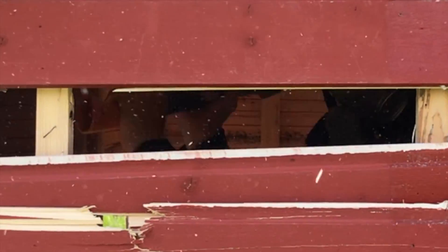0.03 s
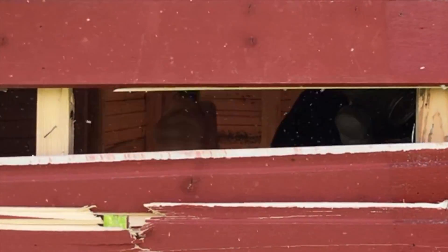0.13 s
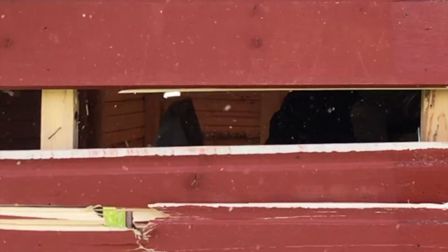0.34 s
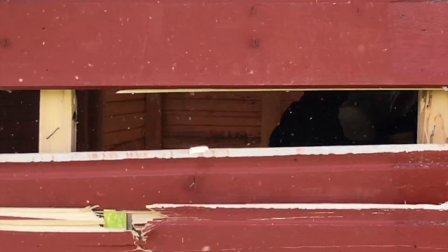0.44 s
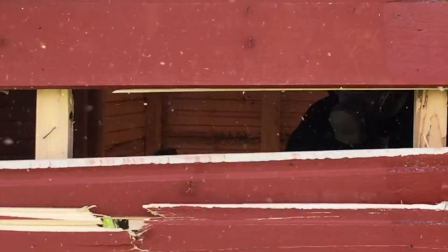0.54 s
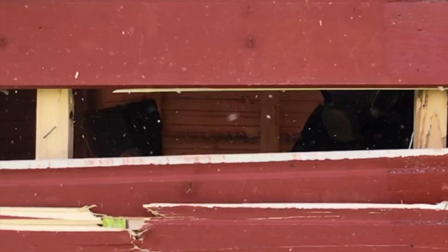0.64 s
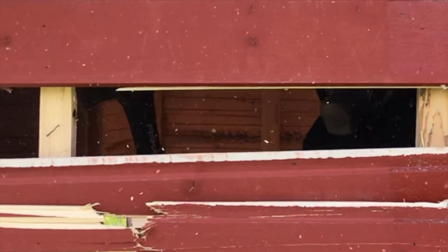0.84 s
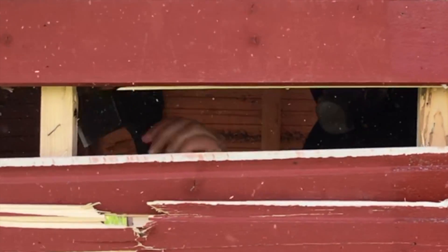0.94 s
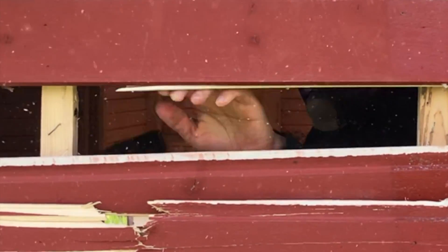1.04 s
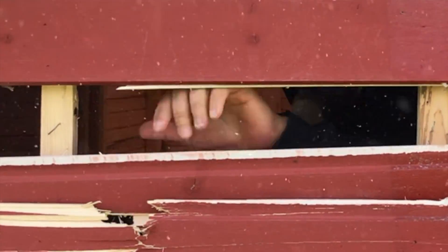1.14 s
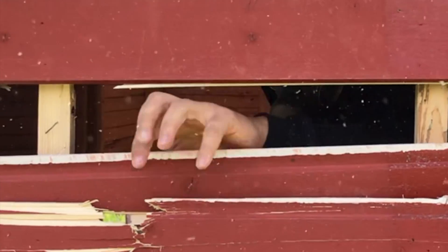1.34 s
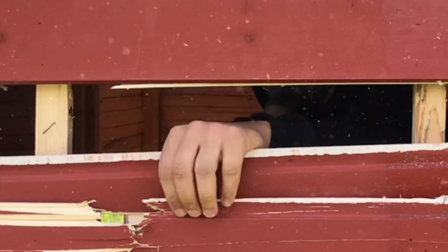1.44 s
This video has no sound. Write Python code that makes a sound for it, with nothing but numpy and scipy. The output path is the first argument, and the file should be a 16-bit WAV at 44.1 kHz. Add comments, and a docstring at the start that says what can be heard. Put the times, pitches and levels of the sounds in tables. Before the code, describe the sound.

Close to a shed wall outdoors, after a faint tap, a heavy blow from inside snaps and splits a plank with a deep boom; splinters tick down, a loose piece clacks later, and a tiny dull knock ends it.

```python
"""Close outside a shed, microphone near the wall: a heavy blow from inside breaks a painted board.
Fibres snap and tear as short noise bursts and board modes, and a split runs along the grain as tiny tones.
The wall booms and rumbles with pulses, damped modes and low noise; a loose piece clacks and pings.
Splinters tick and scrape, pieces knock and scuff inside, all as shaped noise, with a small dull knock late.
Faint tails of decaying noise answer from shed and yard, over faint outdoor air."""
import sys
import numpy as np
from scipy import signal
from scipy.fft import rfft, irfft
from scipy.io import wavfile

SR = 44100
rng = np.random.default_rng(int(sys.argv[2]) if len(sys.argv) > 2 else 0)


def int16_out(signal):
    """Quantize to a 16-bit WAV file."""
    q = np.round(np.clip(np.atleast_2d(signal).T, -1, 1) * 32767)
    wavfile.write(sys.argv[1], SR, q.astype(np.int16))


N = 66150
T = np.arange(N) / SR  # s
HZ = np.fft.rfftfreq(2 * N, 1 / SR)

# Spectra and mode levels below are relative; t60 is the time to fall by 60 dB.
# Fibre bundles giving way: [t/s, level/dB, brightness/dB per octave]
SNAPS = [(0.2189, -40, 3), (.228, -36, -2), (0.231, -20.5, 1.5), (0.2362, -17.5, 1.5), (0.2418, -16, 1),
         (0.244, -17, -1.5), (0.2498, -19.5, 1), (0.259, -25, -3), (.266, -22.5, 2), (.275, -20, 0.5),
         (.283, -25, -1), (0.2935, -30, 2.5), (.306, -29.5, -2), (0.3181, -28, -1), (0.3274, -28.5, -2.5),
         (0.338, -41, 1), (.352, -37.5, 0.5)]
# Tone of snapping wood: [f/Hz, level/dB]
WOOD_TONE = [(60, -7.5), (200, 7), (400, 0), (560, -0.5), (750, 0.5), (1400, -2.5), (2900, -2.5),
             (3600, -10), (6000, -6), (9000, -14.5), (12000, -20.5), (16000, -27)]
# Dying away of a snap: [f/Hz, t60/s]
SNAP_DECAY = [(200, 0.21), (1500, 0.083), (5000, 0.038), (14000, 0.023)]
# Ringing modes of the board: [f/Hz, level/dB, t60/s]
BOARD_MODES = [(484, -5, .25), (1030, 1, .18), (1110, 0, .18), (1551, -4, .13), (1774, -1, .15),
               (2093, -4, .15), (2306, 0, .13), (2642, -1, .12), (2947, 3, .12), (3088, -1, .12)]
# Fibres tearing as the board bends away: [t/s, level/dB]
TEAR_LEVEL = [(.225, -68.5), (.24, -26.5), (.285, -26), (.31, -31.5), (.335, -46.5), (.37, -54),
              (.405, -76)]
# Tone of single fibres: [f/Hz, level/dB]
FIBRE_TONE = [(500, -2), (1500, -2.5), (3000, 1), (6000, -2.5), (10000, -10), (16000, -13.5)]
# Pushes on the wall: [t/s, level/dB, contact pitch f/Hz]
THUMPS = [(0.194, -46.5, 79), (0.2334, -25.5, 212), (0.2382, -13.5, 202), (0.2491, -14.5, 196),
          (0.2656, -20, 190), (0.2753, -15.5, 73), (0.2939, -20, 200), (.306, -11, 119), (.479, -32, 173),
          (0.546, -35.5, 172), (.606, -38, 130), (0.906, -35, 126), (1.116, -28.5, 78), (1.232, -39.5, 172),
          (1.36, -45, 233), (1.381, -39.5, 73)]
# Ringing modes of the wall: [f/Hz, level/dB, t60/s]
WALL_MODES = [(62, 0, .5), (95, 1, .5), (120, -3, .45), (160, -3, .55), (191, -1, .4), (251, -6, .55),
              (298, -5, .45), (331, -4, .5), (398, -6, .4)]
# Low rumble of the shaken wall: [t/s, level/dB]
RUMBLE_LEVEL = [(0, -62), (.17, -53.5), (.24, -40), (.33, -29.5), (.42, -50), (.57, -40.5), (.7, -56),
                (.82, -55.5), (.91, -49), (1.0, -50.5), (1.12, -45), (1.27, -47), (1.32, -56.5), (1.5, -57)]
# Tone of the rumble: [f/Hz, level/dB]
RUMBLE_TONE = [(15, -16.5), (35, -3.5), (62, 4), (100, -2.5), (180, -11.5), (300, -19.5), (600, -47),
               (2000, -82)]
# Strikes of the loose piece: [t/s, level/dB]
CLACKS = [(1.069, -40), (1.0737, -29.5), (1.0798, -23), (1.0863, -27), (1.166, -45.5)]
# Tone of a clack: [f/Hz, level/dB]
CLACK_TONE = [(150, 4.5), (600, -10), (870, -8), (1400, -1.5), (2200, -7), (3200, 5.5), (4300, -2),
              (5400, 1), (7800, -4.5), (9500, -8.5), (12000, -6), (16000, -14)]
# Dying away of a clack: [f/Hz, t60/s]
CLACK_DECAY = [(800, 0.13), (3000, 0.05), (12000, 0.037)]
# Ringing modes of the loose piece: [f/Hz, level/dB, t60/s]
PIECE_MODES = [(870, 0, .08), (1400, -8, .08), (1868, -9, 0.08), (3082, -2, 0.06), (3330, -2, 0.06),
               (4478, -5, .06), (5255, 0, 0.08), (5420, -11, .2), (5532, 2, .07)]
# Hard contacts squeaking for an instant: [t/s, level/dB, f/Hz]
PINGS = [(1.0744, -27.5, 7700), (1.0792, -15, 5450), (1.0875, -21, 5450)]
# Pieces landing and scraping inside: [t/s, level/dB, brightness/dB per octave]
KNOCKS = [(.083, -50.5, 1), (0.4129, -34.5, 2.5), (0.427, -39, -14), (.443, -41.5, 3), (.456, -40, -12.5),
          (0.472, -45, 3.5), (.524, -45.5, -2.5), (1.166, -55, 1), (1.214, -52, -2), (1.331, -60.5, 2.5)]
# Tone of knocks and scuffs: [f/Hz, level/dB]
KNOCK_TONE = [(80, -12), (250, -3.5), (700, 2.5), (1200, -0.5), (1800, -6), (2700, -3.5), (4200, -12),
              (8000, -19), (16000, -28.5)]
# Dying away of a knock: [f/Hz, t60/s]
KNOCK_DECAY = [(200, 0.24), (2000, 0.14), (10000, 0.062)]
# Chips ticking on the outer boards: [t/s, level/dB]
TICKS = [(.0825, -54), (.096, -47), (0.4108, -48.5), (0.4132, -36.5), (0.46, -49), (0.4736, -47),
         (0.486, -38), (0.4911, -24), (.528, -61), (0.543, -49.5), (1.036, -56.5), (1.1646, -50),
         (1.195, -54)]
# Tone of a chip: [f/Hz, level/dB]
CHIP_TONE = [(500, -23.5), (2500, -11), (4000, -3), (5000, -13), (7000, 1.5), (8000, -9.5), (11000, -6),
             (16000, -11.5)]
# Splinters brushing along the boards: [middle t/s, half length/s, level/dB]
SCRAPES = [(0.158, 0.0052, -58.5), (0.507, 0.067, -54.5), (1.178, 0.012, -58.5), (1.262, 0.0089, -57),
           (1.308, 0.017, -57.5)]
# Tone of a scrape: [f/Hz, level/dB]
SCRAPE_TONE = [(800, -16.5), (2500, -7.5), (4200, -1), (6000, 1), (9000, -4.5), (16000, -12)]
# Dull scuffs on the frame: [middle t/s, half length/s, level/dB]
SCUFFS = [(0.458, 0.023, -47.5), (0.556, 0.034, -56.5), (0.974, 0.022, -64.5), (1.347, .022, -58.5),
          (1.434, 0.019, -51)]
# Tone of the light tap before the blow: [f/Hz, level/dB]
CLINK_TONE = [(300, -21), (1100, -14.5), (1600, 9.5), (2000, -3.5), (2400, 3), (3100, -9), (3750, 3),
              (5000, -7.5), (7000, -12), (15000, -28)]
# Tone of the small late knock on the frame: [f/Hz, level/dB]
RAP_TONE = [(400, 3), (650, 12.5), (1000, -6), (1700, -9), (2300, -1), (3000, 2), (3600, -16),
            (8000, -17.5), (16000, -30)]
# Dying away of the echo of the wood: [f/Hz, t60/s]
SHED_DECAY = [(150, 0.98), (1000, 0.98), (2800, 1.19), (6000, 0.47), (14000, 0.88)]
# Dying away of the echo off close walls: [f/Hz, t60/s]
NEAR_DECAY = [(300, 0.17), (1300, 0.39), (14000, 0.37)]
# Tone of both echoes: [f/Hz, level/dB]
ECHO_TONE = [(100, 2.5), (1000, 2), (3000, -7), (6000, -7.5), (15000, -6)]
# Tone of the outdoor air: [f/Hz, level/dB]
AIR_TONE = [(30, 0.5), (300, -2.5), (800, -2), (2600, -8.5), (4500, -15), (9000, -24), (16000, -31.5)]

SNAP_EDGE_DB, SNAP_EDGE_T60_S = -2.5, 0.005  # extra sharpness at the start of a snap
BOARD_DB, WALL_DB, PIECE_DB = -18.5, -19, -14.5  # ringing relative to each strike
FIBRE_RATE, FIBRE_SCATTER_DB, FIBRE_T60_S = 1400, 3, 0.014  # breaks a second, spread of size, ring of each
SPLIT_S, SPLIT_LEN_S, SPLIT_DB = 0.2465, 0.022, -17
# The pitch falls as the freed strip grows; the scatter is in natural-log units.
SPLIT_FROM_HZ, SPLIT_TO_HZ, SPLIT_SCATTER = 3700, 1880, 0.27
SWING_T60_S, SWING_DB = 0.091, -9  # the struck spot swings on, relative to the push
PING_WIDTH_S = 0.00083
CHIP_T60_S, CHIP_TAIL_T60_S, CHIP_TAIL_DB = 0.013, 0.052, -20.5
SCUFF_TILT_DB = -3  # per octave
CLINK_S, CLINK_DB = 0.0056, -45
RAP_S, RAP_DB = 1.4075, -49
SHED_DB, NEAR_DB, AIR_DB = -28, -17.5, -65
TOP_HZ = 15900  # upper band limit of the recorder


def amp(db):
    """Decibels to gain."""
    return 10 ** (np.asarray(db) / 20)


def unit(x):
    """Scale to rms 1."""
    return x / np.sqrt(np.mean(x ** 2) + 1e-20)


def along(points, hz):
    """Interpolate (Hz, value) points on a log frequency axis."""
    f, v = np.transpose(points)
    return np.interp(np.log(hz + 1), np.log(f + 1), v)


def fade(t, t60):
    """Exponential decay, 60 dB down after t60."""
    return np.exp(-np.log(1000) * t / np.maximum(t60, 1e-4))


def hump(middle, half):
    """Bell-shaped swell and fall around a middle time."""
    return np.exp(-((T - middle) / half) ** 2)


def add(out, s, x):
    """Mix x in from time s."""
    i = max(round(s * SR), 0)
    out[i:i + len(x)] += x[:N - i]


def noise(spectrum, tilt=0, spiky=0):
    """Coloured noise of rms 1; tilt is in dB per octave, spiky breaks it into grains."""
    octaves = np.log2(np.maximum(HZ, 200) / 2000)
    grains = np.repeat(rng.standard_normal(N), 16)[:2 * N]  # each held for 16 samples
    white = rng.standard_normal(2 * N) * np.exp(spiky * grains)
    colour = amp(along(spectrum, HZ) + tilt * octaves)
    return unit(irfft(rfft(white) * colour)[:N])


def burst(source, decay, attack_s):
    """Noise that rises quickly and dies at its own speed in each band."""
    hz, t, bands = signal.stft(source[:SR], SR, nperseg=256)
    t60 = along(decay, hz)[:, None]
    x = signal.istft(bands * fade(t, t60), SR)[1][:SR]
    return x * (1 - np.exp(-T[:SR] / attack_s))


def ring(modes, attack_s):
    """Damped modes, each starting at a random phase, with levels a little different for each strike."""
    t = T[:SR]
    x = np.zeros(SR)
    for hz, db, t60 in modes:
        level = amp(db + 2 * rng.standard_normal())
        x += level * np.sin(2 * np.pi * (hz * t + rng.random())) * fade(t, t60)
    return x * (1 - np.exp(-t / attack_s))


def fracture():
    """Each fibre bundle gives way with a grainy, sharp-edged crack that rings the board."""
    out = np.zeros(N)
    edge = 1 + amp(SNAP_EDGE_DB) * fade(T[:SR], SNAP_EDGE_T60_S)
    for s, db, tilt in SNAPS:
        crack = burst(noise(WOOD_TONE, tilt, spiky=0.45), SNAP_DECAY, attack_s=0.00011)
        board = amp(BOARD_DB) * ring(BOARD_MODES, attack_s=0.00078)
        add(out, s, amp(db) * (crack * edge + board))
    return out


def split(count=70, cycles=9):
    """The split runs along the grain in tiny slips of falling pitch, each dying in a few cycles."""
    out = np.zeros(N)
    t = T[:SR // 20]
    for k, (jitter, pitch, push) in enumerate(rng.standard_normal((count, 3))):
        u = (k + jitter / 2) / count  # progress along the split
        glide = SPLIT_FROM_HZ * (SPLIT_TO_HZ / SPLIT_FROM_HZ) ** u
        hz = glide * np.exp(SPLIT_SCATTER * pitch)
        strength = np.sign(push) * np.sqrt(abs(np.sin(np.pi * u)))
        slip = np.sin(2 * np.pi * hz * t) * fade(t, cycles / hz)
        add(out, SPLIT_S + u * SPLIT_LEN_S, strength * slip)
    # the level is counted over the length of the split
    return amp(SPLIT_DB) * unit(out) * np.sqrt(SPLIT_LEN_S * SR / N)


def tearing():
    """Single fibres break at random between the big snaps, each ringing for an instant."""
    hits = rng.random(N) < FIBRE_RATE / SR
    signs = rng.choice([-1, 1], N)
    sizes = amp(FIBRE_SCATTER_DB * np.clip(rng.standard_normal(N), -2, 2))
    fibre = noise(FIBRE_TONE) * fade(T, FIBRE_T60_S)
    crackle = unit(signal.fftconvolve(hits * signs * sizes, fibre)[:N])
    active = (T > TEAR_LEVEL[0][0]) * (T < TEAR_LEVEL[-1][0])
    return amp(np.interp(T, *np.transpose(TEAR_LEVEL))) * active * crackle


def wall():
    """Each push bends the wall, which swings back and booms; low noise makes the rumble."""
    out = np.zeros(N)
    for s, db, hz in THUMPS:
        u = (np.pi * hz * (T - s)) ** 2
        out += amp(db) * (2 * u - 1) * np.exp(-u)  # a single push and rebound
        swing = -np.cos(2 * np.pi * hz * T) * (1 - np.exp(-2 * hz * T)) * fade(T, SWING_T60_S)
        add(out, s, amp(db + SWING_DB) * swing)
        boom = np.zeros(N)
        for f, level, t60 in WALL_MODES:
            drive = amp(level) / (1 + (f / hz) ** 2)  # slow contacts excite high modes less
            boom += drive * np.sin(2 * np.pi * f * T) * fade(T, t60)
        add(out, s, amp(db + WALL_DB) * boom)
    rumble = amp(np.interp(T, *np.transpose(RUMBLE_LEVEL))) * noise(RUMBLE_TONE)
    return out + rumble


def loose_piece():
    """A hard piece strikes with grainy cracks, mostly in quick succession, and rings in its modes."""
    out = np.zeros(N)
    for s, db in CLACKS:
        crack = burst(noise(CLACK_TONE, spiky=0.54), CLACK_DECAY, attack_s=0.0001)
        body = amp(PIECE_DB) * ring(PIECE_MODES, attack_s=0.00045)
        add(out, s, amp(db) * (crack + body))
    return out


def pings():
    """Hard contacts squeak as very short high tones inside the clack."""
    out = np.zeros(N)
    for s, db, hz in PINGS:
        out += amp(db) * np.sin(2 * np.pi * hz * T) * hump(s, PING_WIDTH_S)
    return out


def inside_knocks():
    """Pieces land inside the shed as grainy bursts of mostly dull noise."""
    out = np.zeros(N)
    for s, db, tilt in KNOCKS:
        knock = burst(noise(KNOCK_TONE, tilt, spiky=0.4), KNOCK_DECAY, attack_s=0.0008)
        add(out, s, amp(db) * knock)
    return out


def outside_splinters():
    """Chips tick as bright decaying noise and splinters scrape as grainy swells on the outer boards."""
    out = np.zeros(N)
    for s, db in TICKS:
        decay = fade(T, CHIP_T60_S) + amp(CHIP_TAIL_DB) * fade(T, CHIP_TAIL_T60_S)
        add(out, s, amp(db) * noise(CHIP_TONE) * decay)
    for s, half, db in SCRAPES:
        out += amp(db) * noise(SCRAPE_TONE, spiky=0.59) * hump(s, half)
    return out


def frame_scuffs():
    """Dull grainy noise swells and falls as the frame is scuffed."""
    out = np.zeros(N)
    for s, half, db in SCUFFS:
        out += amp(db) * noise(KNOCK_TONE, SCUFF_TILT_DB, spiky=0.52) * hump(s, half)
    return out


def tap_and_rap():
    """A light tap before the blow and a small late knock on the frame, each a smooth noise burst."""
    out = np.zeros(N)
    tap_decay = [(1600, 0.21), (4000, 0.24)]  # f/Hz, t60/s
    add(out, CLINK_S, amp(CLINK_DB) * burst(noise(CLINK_TONE), tap_decay, attack_s=0.0004))
    add(out, RAP_S, amp(RAP_DB) * burst(noise(RAP_TONE), KNOCK_DECAY, attack_s=0.00053))
    return out


def echo(x, decay, attack_s):
    """The shed and the yard answer with a tail of decaying noise."""
    tail = burst(noise(ECHO_TONE), decay, attack_s)
    return signal.fftconvolve(x, tail / np.linalg.norm(tail))[:N]


def outdoor_air():
    """Faint steady noise, weaker towards the treble."""
    return amp(AIR_DB) * noise(AIR_TONE)


def scene():
    """Breaking wood, loose piece and wall, with the echoes and the outdoor air, in mono."""
    breaking = fracture() + split() + tearing()
    debris = inside_knocks() + outside_splinters() + frame_scuffs() + tap_and_rap()
    wood = breaking + debris
    piece = loose_piece()
    shed_echo = amp(SHED_DB) * echo(wood, SHED_DECAY, attack_s=0.019)
    near_echo = amp(NEAR_DB) * echo(piece, NEAR_DECAY, attack_s=0.0081)
    direct = wood + piece + pings() + wall()
    return (direct + shed_echo + near_echo + outdoor_air())[None]


def record(dry):
    """The recorder rounds off the highest peaks and cuts steeply above its band limit."""
    held = dry / (1 + np.abs(dry / 0.6) ** 6) ** (1 / 6)  # peaks stay within 0.6
    low_pass = 1 / np.sqrt(1 + (HZ / TOP_HZ) ** 200)
    return irfft(rfft(held, 2 * N) * low_pass)[:, :N]


dry = scene()
out = record(dry)
int16_out(out)
```